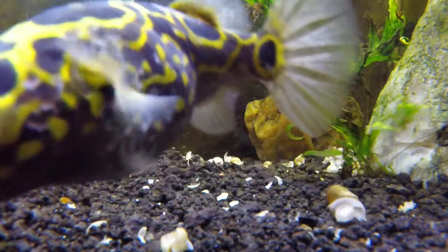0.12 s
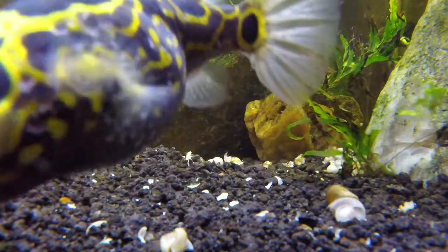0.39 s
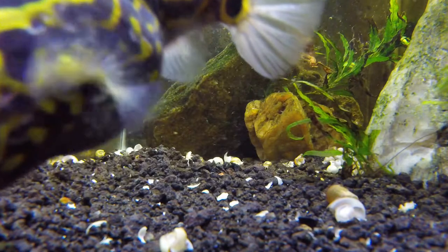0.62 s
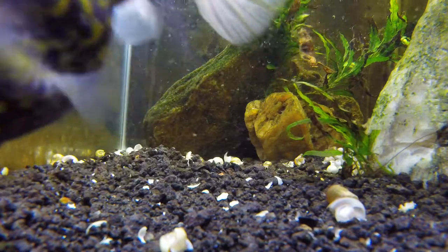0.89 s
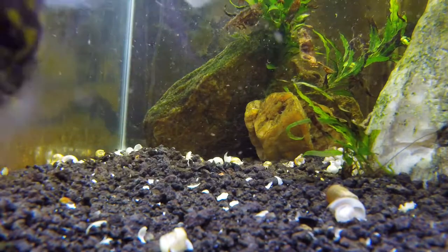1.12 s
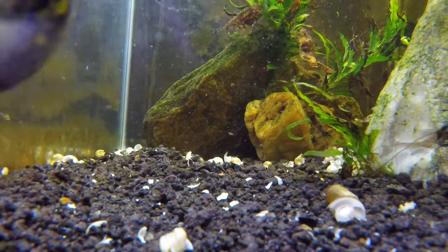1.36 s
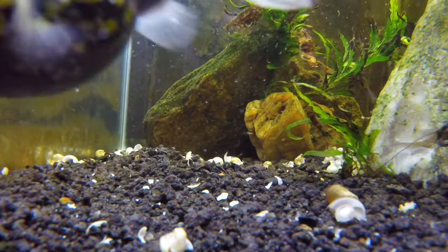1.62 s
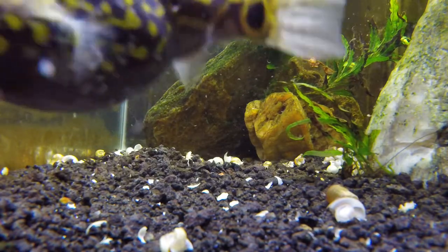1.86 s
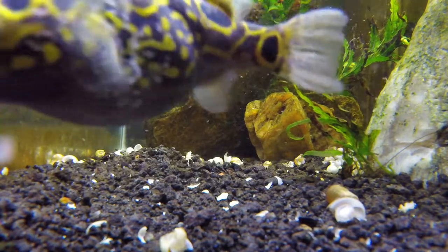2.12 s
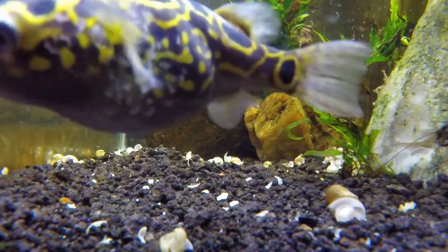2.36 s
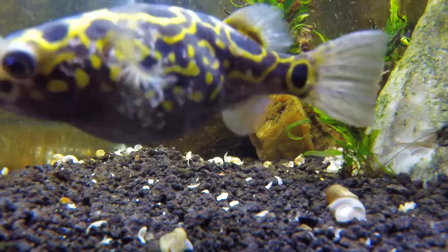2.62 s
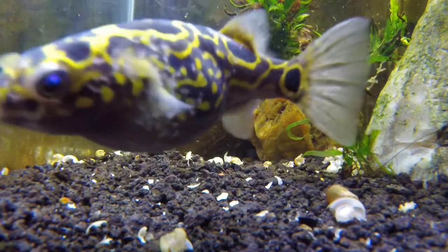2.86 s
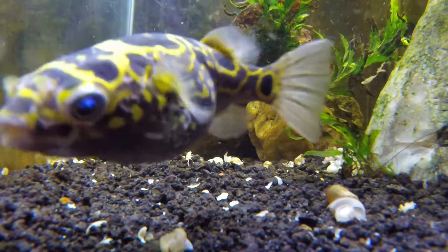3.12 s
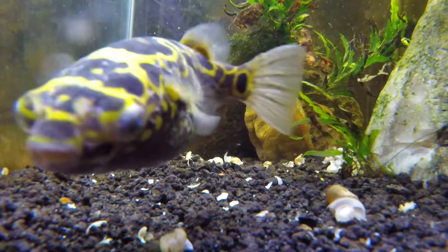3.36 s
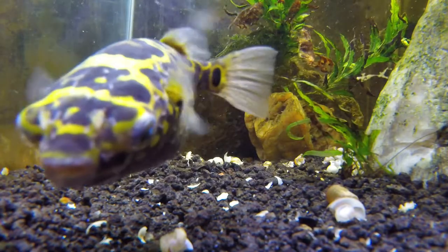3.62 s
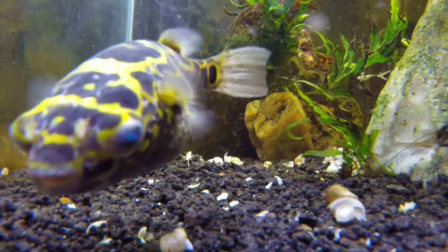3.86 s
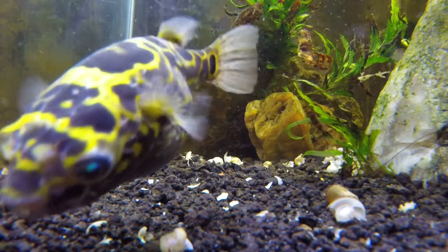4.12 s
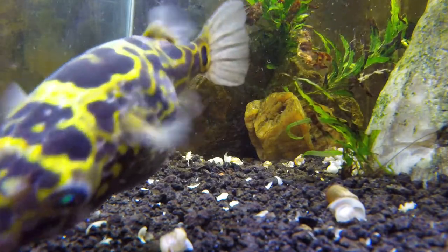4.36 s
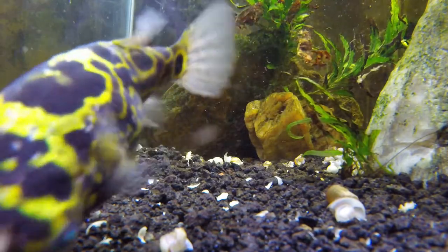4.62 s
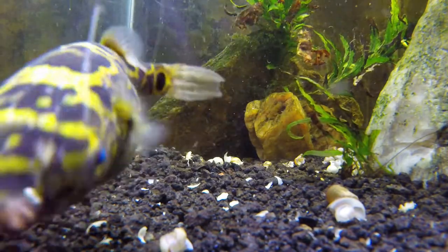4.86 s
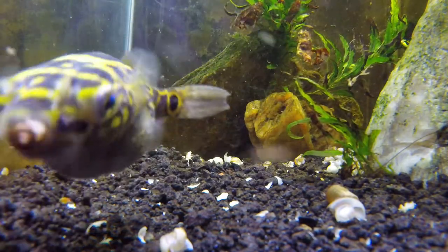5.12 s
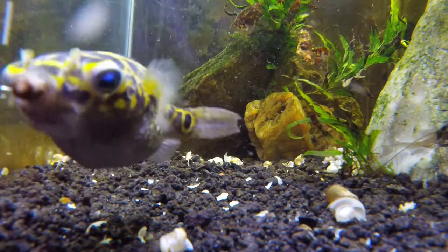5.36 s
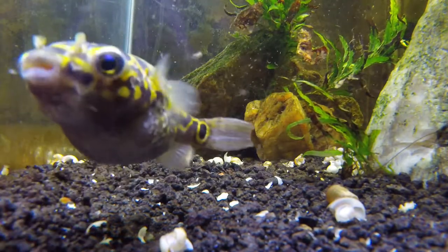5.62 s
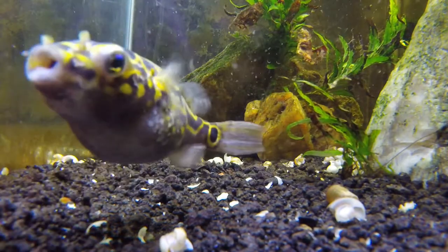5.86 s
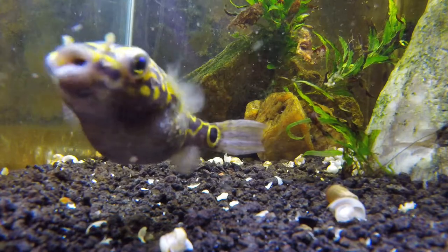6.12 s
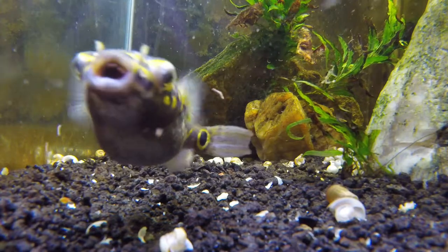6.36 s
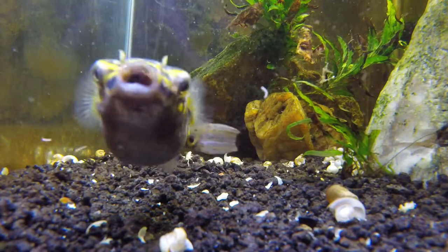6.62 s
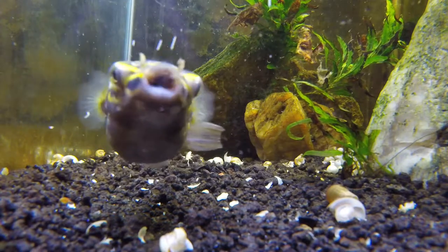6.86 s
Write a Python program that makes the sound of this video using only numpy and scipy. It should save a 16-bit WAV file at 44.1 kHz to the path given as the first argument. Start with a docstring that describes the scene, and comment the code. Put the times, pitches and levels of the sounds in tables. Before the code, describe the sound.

A loud, steady low pump hum, around 60 and 120 hertz with a buzzier tone near 300, runs throughout about seven seconds, over gently swelling muffled rumble. The microphone sits underwater in a sealed camera housing on tank gravel, adding very faint hiss and a thin high whistle. Tiny bubbles ping now and then, brief and high, rising slightly. From 1.14 to 1.28 s a fish cracks shell close by: a rapid run of hollow knocks with light gritty grinding, strongest at the end. Only hum and bubbles follow until 4.65 s, when a knock begins another series, with a very hard crack at 4.81, smaller crunches around 5.0, and a bright, splintery cluster at 5.27-5.37. Faint ticks continue from 5.5 to 6.4, then a crisp crunching burst comes at 6.45-6.56. The hum dips just ahead of the loudest cracks and creeps back up.

```python
"""First a mains pump, humming and rumbling through glass and water as summed harmonics and noise resonances.
The microphone is in a small camera in a sealed housing on the gravel of a fish tank, with hiss and a whistle.
Nearby a fish cracks and grinds snail shells: each blow rings the housing's decaying modes. Small bubbles, and
now and then the housing's air cavity, ping as brief tones that rise a little. The camera's gain control steps
down just ahead of the loudest cracks and creeps back up."""
import sys
import numpy as np
from scipy import signal
from scipy.fft import rfft, irfft, next_fast_len
from scipy.io import wavfile
from scipy.ndimage import uniform_filter1d

SR = 44100
rng = np.random.default_rng(int(sys.argv[2]) if len(sys.argv) > 2 else 0)


def boost_factor(decibels):
    """Convert a level in decibels to a linear amplitude factor."""
    exponent = np.asarray(decibels, float) / 20
    return 10 ** exponent


def master_out(mix):
    """Clip the mix to full scale and print it as 16-bit PCM to the path in sys.argv[1]."""
    frames = np.transpose(np.atleast_2d(mix))
    ceiling = np.clip(frames, -1, 1)
    pcm = np.round(ceiling * 32767).astype(np.int16)
    wavfile.write(sys.argv[1], SR, pcm)


N = 307768  # samples, about 7 s


def coloured(gain_of_hz):
    """Noise with the given amplitude per root Hz, shaped in its spectrum."""
    size = next_fast_len(N)
    hz = np.maximum(np.arange(size // 2 + 1) * SR / size, 1.0)
    spectrum = rfft(rng.standard_normal(size)) * gain_of_hz(hz)
    return irfft(spectrum, size)[:N] * np.sqrt(SR / 2)


def resonance(centre_hz, width_hz, rms_db):
    """Noise through a steep resonance, set to the given rms level."""
    noise = coloured(lambda f: 1 / (1 + ((f - centre_hz * centre_hz / f) / width_hz) ** 2))
    return boost_factor(rms_db) * noise / noise.std()


def walk(rate_hz):
    """Random levels drawn at the given rate and slewed smoothly; standard deviation 1."""
    hold = int(SR / rate_hz)
    levels = np.repeat(rng.standard_normal(N // hold + 1), hold)
    smooth = uniform_filter1d(uniform_filter1d(levels, hold), hold)[:N]
    return smooth / smooth.std()


def ring(hz, t60_s, glide=0.0, rise_cycles=0.95):
    """One mode decaying by 60 dB in t60_s; the soft contact lets it build up over rise_cycles."""
    t = np.arange(int(t60_s * SR) + 1) / SR
    rise = np.sin(np.pi / 2 * np.minimum(t * hz / rise_cycles, 1)) ** 2
    tone = np.sin(2 * np.pi * hz * t * (1 + glide * t / t60_s))
    return rise * tone * np.exp(-np.log(1000) * t / t60_s)


def add(out, start_s, sound):
    """Mix a sound into out from its start time."""
    i = int(start_s * SR)
    out[i:i + len(sound)] += sound[:N - i]


# Broad rumble and hiss at the microphone. Each row: frequency in Hz, density in dB per Hz (before flicker).
FLOOR_SPECTRUM = [(15, -78.5), (30, -57.5), (50, -54.5), (300, -54.5), (600, -68.5), (900, -88.5),
                  (1250, -102), (3000, -105), (4300, -114), (6000, -107), (7500, -100), (10300, -110),
                  (12000, -108), (13800, -116), (14400, -140)]
# Air cavity at the microphone, lit by the hiss. One row: centre in Hz, width in Hz, rms in dB before flicker.
CAVITY_WHISTLE = (6510, 500, -67.5)


def hiss():
    """Broad noise floor and the cavity whistle; bands above 3 kHz and the whistle flicker separately."""
    floor_hz, floor_db = np.transpose(FLOOR_SPECTRUM)

    def band(low_hz, high_hz):
        def gain(f):
            level_db = np.interp(np.log(f), np.log(floor_hz), floor_db)
            return boost_factor(level_db) * (f >= low_hz) * (f < high_hz)
        return coloured(gain)

    flicker_db, flicker_hz = 2.0, 30.0
    steady = band(0, 3000)
    treble = [band(3000, 6000), band(6000, 9500), band(9500, SR), resonance(*CAVITY_WHISTLE)]
    return steady + sum(boost_factor(flicker_db * walk(flicker_hz)) * part for part in treble)


# Pump hum. Each row: multiple of the mains frequency, rms in dB.
PUMP_HUM = [(1, -18), (2, -18.5), (3, -39.5), (4, -33.5), (5, -20.5), (6, -32), (7, -48), (8, -45)]
# Tank and stand resonances fed by the pump's rumble. Each row: centre in Hz, width in Hz, rms in dB
# before the swell.
TANK_RESONANCES = [(73, 15, -28), (108.2, 9.9, -38), (154, 40, -33), (200, 24, -33), (265.2, 35, -24),
                   (310, 36, -27.5), (355, 31, -38.5), (396, 90, -46), (439.3, 57, -35.5),
                   (527.6, 43, -36.5), (605.7, 54, -35), (693, 62, -46), (771, 120, -51.5), (1066, 25, -68)]


def pump():
    """Steady mains harmonics over rumble that swells resonance by resonance."""
    mains_hz = 60.009
    swell_db, swell_hz = 1.5, 3.6
    turn = 2 * np.pi * mains_hz * np.arange(N) / SR
    hum = np.zeros(N)
    for multiple, rms_db in PUMP_HUM:
        phase = 2 * np.pi * rng.random()
        hum += np.sqrt(2) * boost_factor(rms_db) * np.sin(multiple * turn + phase)
    rumble = sum(boost_factor(swell_db * walk(swell_hz)) * resonance(*row) for row in TANK_RESONANCES)
    return hum + rumble


def fizz(per_second=5.0, faintest_db=-66, excess_db=2.5):
    """Now and then a fainter bubble of random pitch; levels exceed the faintest by excess_db on average."""
    out = np.zeros(N)
    for when, pitch, size in rng.random((int(per_second * N / SR), 3)):
        level_db = faintest_db - excess_db * np.log(1 - size)
        ping = ring(2500 + 4000 * pitch, 0.017, rise_cycles=3.0)
        add(out, when * N / SR, boost_factor(level_db) * ping)
    return out


# Short pings: small bubbles in the tank, and near 6.5 kHz the housing's air cavity. Each row: start in seconds,
# starting pitch in Hz, level in dB.
PINGS = [(.058, 5100, -57), (.181, 5200, -42.5), (.347, 4000, -62), (.495, 4580, -50.5),
         (.587, 4820, -46), (.634, 6600, -44), (1.116, 4930, -54), (1.577, 6400, -40.5),
         (1.623, 5080, -47.5), (1.779, 4570, -50.5), (2.056, 2420, -51), (2.177, 4700, -53),
         (3.017, 6800, -48), (3.248, 4460, -60), (3.519, 4360, -61.5), (4.18, 3780, -59),
         (4.383, 5160, -52.5), (4.542, 4700, -48), (4.793, 6540, -40.5), (4.901, 5220, -33.5),
         (5.858, 2750, -42.5), (6.011, 4720, -43.5), (6.233, 6580, -39.5), (6.404, 2750, -43),
         (6.872, 4330, -47.5)]


def pings():
    """Short decaying pings that build up over several cycles and rise a little in pitch."""
    out = np.zeros(N)
    for start_s, hz, level_db in PINGS:
        add(out, start_s, boost_factor(level_db) * ring(hz, 0.027, glide=0.006, rise_cycles=5.7))
    return out


# Teeth grinding shell nearby. Each row: start in seconds, end in seconds, level in dB.
GRINDING_SPELLS = [(1.137, 1.236, -54.5), (1.271, 1.278, -46), (4.613, 4.747, -55), (4.807, 4.849, -46.5),
                   (4.89, 4.935, -53), (5.017, 5.093, -50), (5.273, 5.275, -42), (5.316, 5.387, -48.5),
                   (5.534, 5.557, -51), (6.452, 6.55, -54)]
# Modes of the camera housing, in five groups (knock, body, snap, shell, cavity).
# Each row in a group: frequency in Hz, relative level in dB, 60 dB decay time in seconds.
HOUSING_MODES = [
    [(612, 3, 0.034), (669, -7.5, 0.049), (780, -11, 0.037), (964, -13.5, 0.0086)],
    [(1057, -1.5, 0.021), (1320, -3, 0.0087), (1540, -1, 0.0091), (1740, -1, 0.0085)],
    [(2010, -1, 0.016), (2460, 2, 0.013), (2750, -6.5, 0.0026)],
    [(3540, -3.5, .009), (4050, -8.5, 0.011), (4900, -8.5, 0.016), (5100, -4, 0.023)],
    [(5670, -11, 0.03), (6470, 1, 0.024), (6800, -10, 0.021), (8000, -16, 0.007), (9600, -25, .005)],
]


def grinding(grits_per_s=790.0, excess_db=3.0):
    """Dense grit of uneven size strikes the upper housing modes, body and snap hardest."""
    t = np.arange(N) / SR
    strikes = (rng.random(N) < grits_per_s / SR) * rng.choice([-1, 1], N)
    sizes = boost_factor(excess_db * rng.exponential(size=N))
    envelope = sum(boost_factor(db) * (t > start_s) * (t < end_s) for start_s, end_s, db in GRINDING_SPELLS)
    grit = strikes * sizes * envelope
    out = np.zeros(N)
    # group levels in dB: body, snap, shell, cavity
    for group, group_db in zip(HOUSING_MODES[1:], (0, -5.5, -18, -18)):
        for hz, mode_db, t60_s in group:
            out += boost_factor(mode_db + group_db) * signal.fftconvolve(grit, ring(hz, t60_s))[:N]
    return out


# Shell cracks close to the housing. Each row: start in seconds, knock level in dB, snap level in dB,
# brightness in dB (how much harder than usual the top modes are struck).
SHELL_CRACKS = [(1.1384, -13, -50, -10.5), (1.1507, -16, -60.5, -3.5), (1.1613, -18.5, -55, -5),
                (1.1684, -11.5, -50, -4.5), (1.19, -13, -33, -1), (1.1953, -12.5, -37.5, -9.5),
                (1.2242, -19, -50.5, -9.5), (1.2681, 0, -31, -5.5), (1.2724, -2.5, -48, -3.5),
                (1.2754, -3.5, -37, -5), (4.6482, -4, -29, -7), (4.6809, -25, -42.5, -12),
                (4.697, -20, -40, -16), (4.7079, -20, -43, -10), (4.8144, 4, -18.5, -4.5),
                (4.8188, -21, -36, 8), (4.8327, -22, -39, -14), (4.897, -40, -42, -8.5),
                (5.018, -26.5, -29.5, -8.5), (5.0349, -35, -44, -6), (5.0567, -33, -35, -13.5),
                (5.0635, -35, -38.5, -10), (5.0779, -24.5, -43, -3.5), (5.266, -37.0, -29, -7),
                (5.3177, -35, -42, -5.5), (5.3256, -30, -28.5, 3), (5.327, -24, -25.5, -1),
                (5.3364, -18, -34, 3), (5.3445, -12, -14, 3.5), (5.3541, -16, -27, -6),
                (5.364, -14, -31, 0), (5.477, -46.5, -48, -10), (5.5334, -39, -49.5, 8),
                (5.547, -34, -41, 4), (5.5556, -38.5, -45.5, 14), (5.808, -44.5, -52.5, 17.5),
                (5.9332, -41.5, -53.5, 11.5), (6.1714, -44, -47.5, 12), (6.2868, -40, -52, 14),
                (6.4156, -45, -41.5, 10.5), (6.4532, -23.0, -33, -5.5), (6.469, -38.5, -50, 0),
                (6.479, -21, -42.5, 14), (6.487, -23, -30.5, 5), (6.5012, -25, -28.5, 3.5),
                (6.5036, -17, -35, 15), (6.5101, -1.5, -24.5, 12.5), (6.5234, -29, -37, 10.5),
                (6.5309, -14, -34, 0.5), (6.5433, -12.5, -44.5, 10.5), (6.556, -21.5, -45.5, 12)]
# How a crack shares out, one row each for body, snap, shell and cavity. Each row: level above the snap in dB,
# dB per dB of brightness, dB per dB that the knock exceeds the snap.
CRACK_SHARES = [(1, -0.21, 0.258), (0.5, 0, 0), (-11.5, 1.27, 0), (-12.5, 0.92, 0)]


def cracks():
    """Each crack knocks the housing; it and trailing splinters strike the upper modes unevenly."""
    splinters, mean_lag_s = 14, 0.013
    splinter_db, fade_db = -16, 6.5  # level at no lag; loss per mean lag
    scatter_db, detune = 3.0, 0.024  # standard deviations from mode to mode and blow to blow
    out = np.zeros(N)
    for start_s, knock_db, snap_db, bright_db in SHELL_CRACKS:
        for hz, mode_db, t60_s in HOUSING_MODES[0]:
            add(out, start_s, -boost_factor(knock_db + mode_db) * ring(hz, t60_s))

        upper = []
        for group, (share_db, slope, pull) in zip(HOUSING_MODES[1:], CRACK_SHARES):
            group_db = snap_db + share_db + slope * bright_db + pull * (knock_db - snap_db)
            upper += [(hz, mode_db + group_db, t60_s) for hz, mode_db, t60_s in group]

        lags = rng.exponential(size=splinters)
        blow_lags = np.r_[0, lags]  # the crack itself, then its splinters
        blow_levels_db = np.r_[0, splinter_db - fade_db * lags]
        for lag, blow_db in zip(blow_lags, blow_levels_db):
            for hz, level_db, t60_s in upper:
                size, pitch = rng.standard_normal(2)
                strike = ring(hz * (1 + detune * pitch), t60_s)
                add(out, start_s + mean_lag_s * lag, boost_factor(level_db + blow_db + scatter_db * size) * strike)
    return out


def scene():
    """Everything as it reaches the microphone, one channel."""
    return (hiss() + pump() + fizz() + pings() + grinding() + cracks())[None]


def gain_control(x):
    """Once a block the gain jumps down if needed to fit the highest peak just ahead, then creeps back."""
    first_block_s, block_s, look_ahead_s = 0.0257, 0.032, 0.069
    ceiling, top_db = 0.72, -0.45  # peak amplitude; resting gain
    recover_s = 1.42  # time constant of the creep, in dB
    edges = np.r_[0, np.arange(first_block_s, N / SR, block_s) * SR, N].astype(int)
    gain_db = np.empty(N)
    now_db = top_db
    for a, b in zip(edges[:-1], edges[1:]):
        peak = np.abs(x[a:a + int(look_ahead_s * SR)]).max()
        now_db = min(now_db, 20 * np.log10(ceiling / peak))
        gain_db[a:b] = top_db + (now_db - top_db) * np.exp(-np.arange(b - a) / SR / recover_s)
        now_db = gain_db[b - 1]
    return x * boost_factor(gain_db)


def roll_off(x):
    """The treble ends steeply here."""
    return signal.sosfilt(signal.butter(12, 14440, fs=SR, output="sos"), x)


def record(dry):
    """The camera rides the level of what its microphone hears and keeps the result."""
    mix = gain_control(dry[0])[None]
    return roll_off(mix)


dry = scene()
out = record(dry)
master_out(out)
```